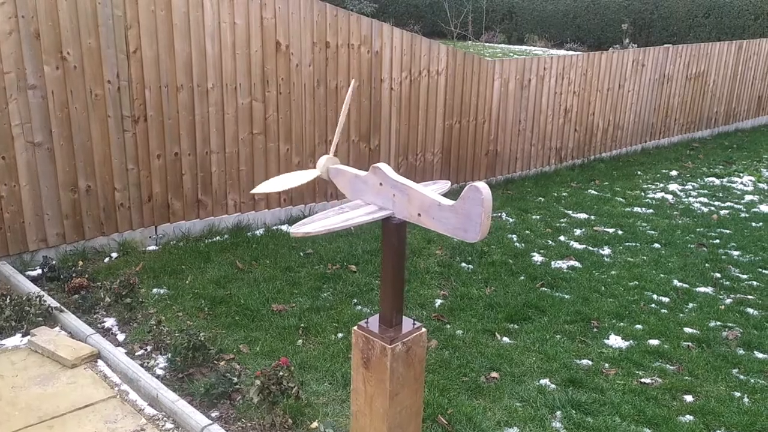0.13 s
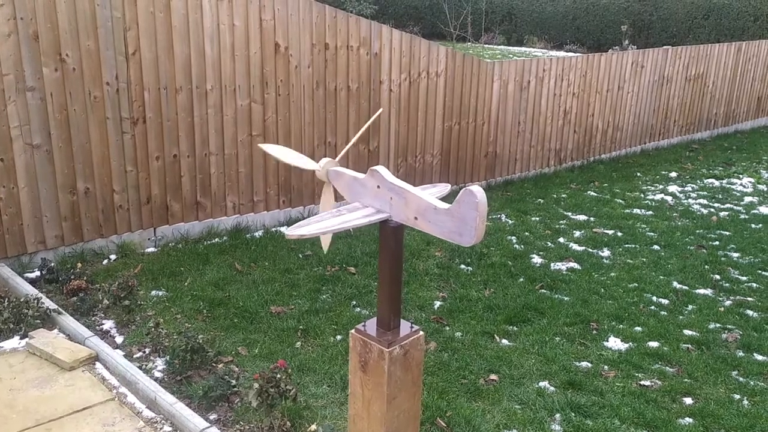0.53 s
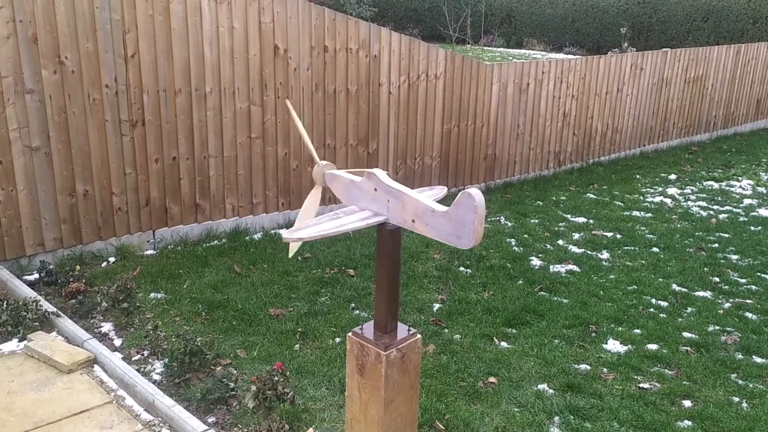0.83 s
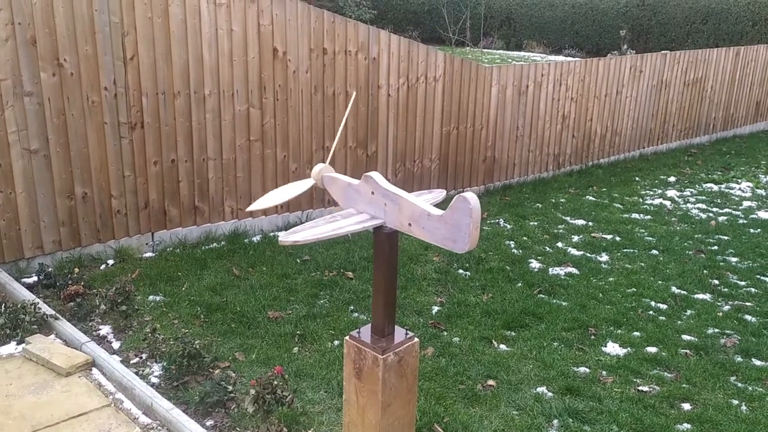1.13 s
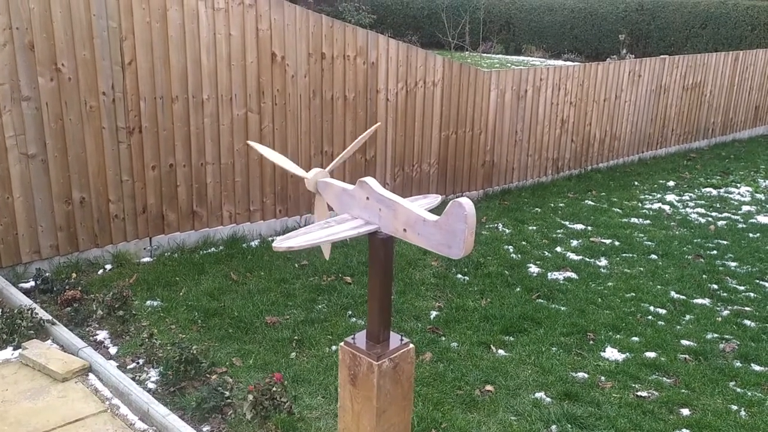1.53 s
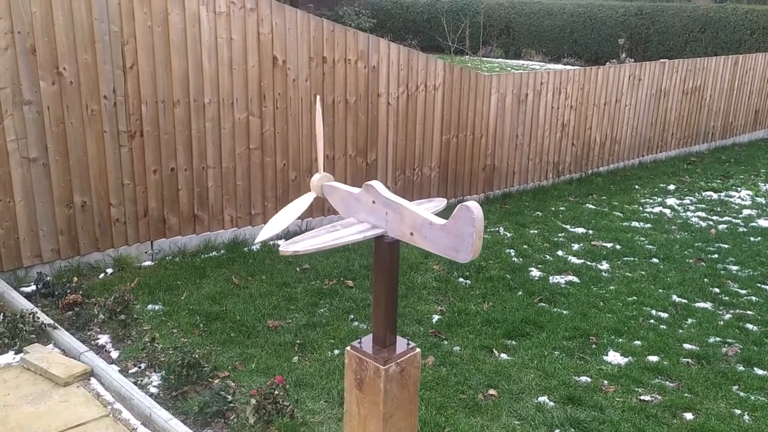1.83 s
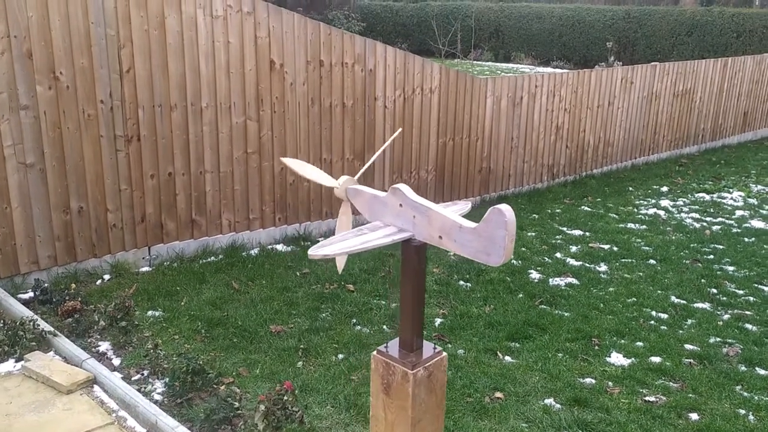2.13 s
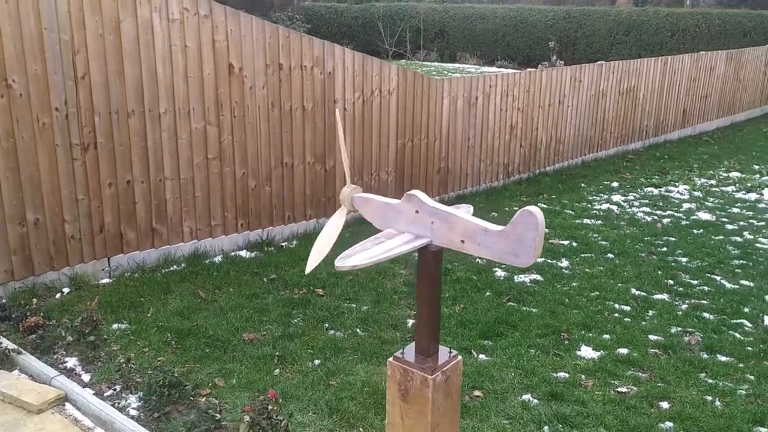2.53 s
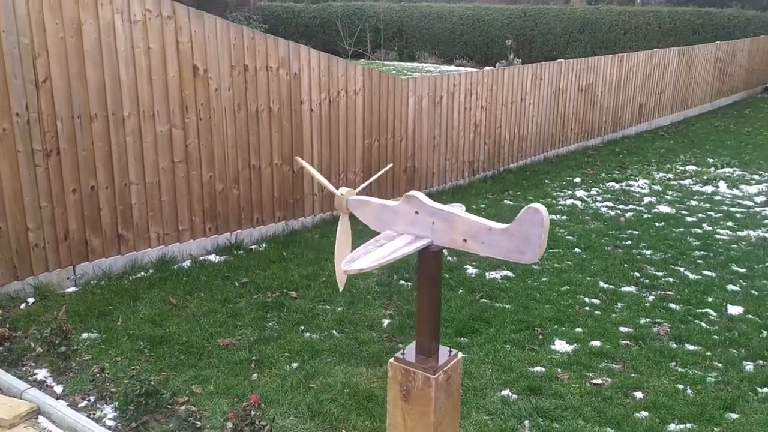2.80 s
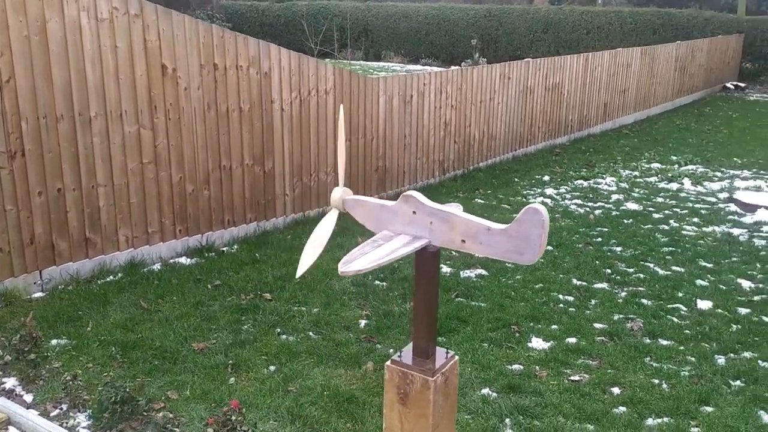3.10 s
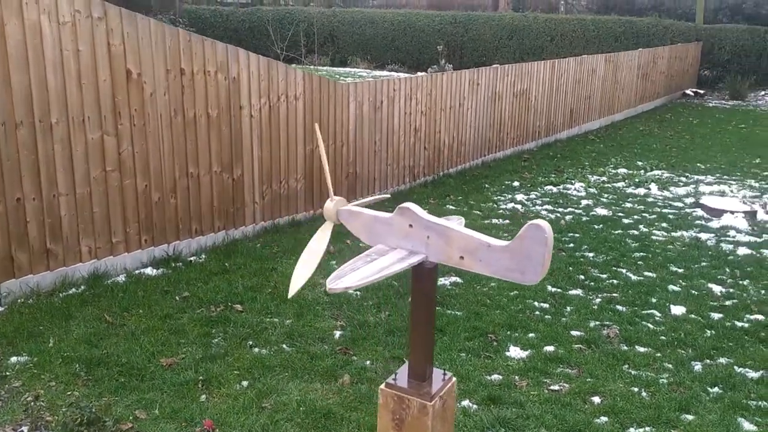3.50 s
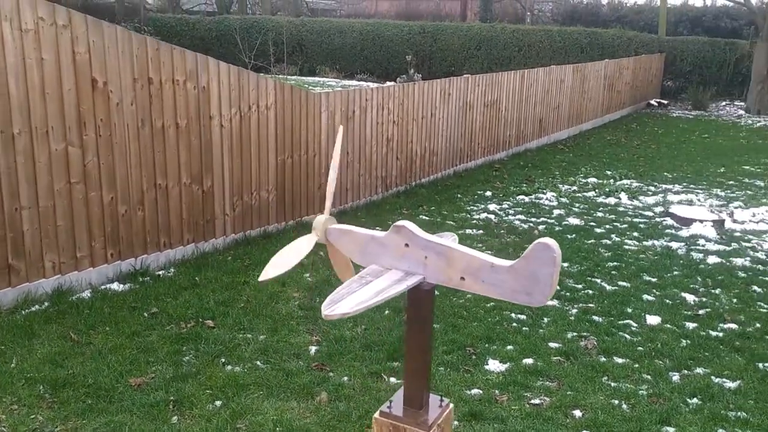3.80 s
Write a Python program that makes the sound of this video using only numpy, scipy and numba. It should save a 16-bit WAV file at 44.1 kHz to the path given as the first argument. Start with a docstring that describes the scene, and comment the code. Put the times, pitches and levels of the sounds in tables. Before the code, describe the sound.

Gusty wind rumbles and buffets against a handheld microphone in a quiet garden

```python
"""Gusty wind on a handheld microphone

Wind buffets the two ports of a microphone in a garden, each port on its own: filtered noise makes a deep rumble
that turns sharper whenever a fast eddy strikes, with pressure spikes, crackle and a little overload.
Behind it lie the hiss of hedges and far traffic (shaped noise), thin faint chirps and squeaks (gliding tones
blurred with narrow noise), and a few small clicks (short bursts of resonant noise)."""
import sys
import numpy as np
from scipy import signal
from scipy.fft import rfft, irfft
from scipy.io import wavfile
from scipy.ndimage import uniform_filter1d
from numba import njit

SR = 44100
rng = np.random.default_rng(int(sys.argv[2]) if len(sys.argv) > 2 else 0)


def log_audio(samples):
    """Write samples as a 16-bit WAV file to the path given in sys.argv[1]."""
    # one column per channel
    frames = np.atleast_2d(samples).T
    # limit to full scale, then quantise
    limited = np.clip(frames, -1, 1)
    pcm = np.round(limited * 32767).astype(np.int16)
    wavfile.write(sys.argv[1], SR, pcm)


N = 174195  # length in samples


def undb(db):
    """Turn decibels into a plain ratio."""
    return 10 ** (np.asarray(db) / 20)


def unit(x):
    """Scale a signal to an rms of 1."""
    return x / np.sqrt(np.mean(x ** 2))


def curve(table, index):
    """One column of a table, joined by straight lines in time."""
    a = np.array(table, float)
    return np.interp(np.arange(N) / SR, a[:, 0], a[:, index])


@njit
def svf(x, hz, k):
    """State-variable filter with moving centre and damping k; rows are low, band and high."""
    y, b, l = np.empty((3, len(x))), 0., 0.
    for i in range(len(x)):
        g = np.tan(np.pi * hz[i] / SR)
        v = (b + g * (x[i] - l)) / (1 + g * (g + k))
        low = l + g * v
        y[0, i] = low
        y[1, i] = k * v
        y[2, i] = x[i] - k * v - low
        b, l = 2 * v - b, 2 * low - l
    return y


def steady_svf(x, hz, k):
    """The same filter with its centre held still."""
    return svf(x, np.full(len(x), float(hz)), k)


def walk(hz):
    """Smooth random wander up to about hz, rms 1: noise averaged twice over a sliding window."""
    window = max(int(SR / hz), 1)
    once = uniform_filter1d(rng.standard_normal(N), window)
    return unit(uniform_filter1d(once, window))


def coloured(points):
    """Noise shaped to a spectrum of (pitch_hz, level_db) points, silent below the first, rms 1."""
    a = np.array(points, float)
    f = np.maximum(np.arange(N // 2 + 1) * SR / N, 1)
    shape_db = np.interp(np.log(f), np.log(a[:, 0]), a[:, 1])
    spectrum = rfft(rng.standard_normal(N)) * undb(shape_db) * (f > a[0, 0])
    return unit(irfft(spectrum, N))


def eddy_strength(eddies):
    """Strength in dB of the strongest eddy at each moment; each rises faster than it falls."""
    rise_share = 0.45  # rise time as a share of the fall time
    t, eddy_db = np.arange(N) / SR, np.zeros(N)
    for at, db, fall_ms in eddies:
        width_ms = fall_ms * np.where(t < at, rise_share, 1)
        bump = db * np.exp(-((t - at) * 1000 / width_ms) ** 2)
        eddy_db = np.maximum(eddy_db, bump)
    return eddy_db


def swirling_air():
    """Raw turbulence: noise weaker toward the treble, through the microphone's resonant low end, rms 1."""
    mic_low_hz, mic_q = 56, 0.88
    even, even_s = 0.9, 0.045  # how far slow chance swells are ironed out (0-1), and over what time
    f = np.maximum(np.arange(N // 2 + 1) * SR / N, 20)
    swirl = irfft(rfft(rng.standard_normal(N)) / f, N)
    swirl = unit(steady_svf(swirl, mic_low_hz, 1 / mic_q)[2])
    swell = uniform_filter1d(abs(swirl), int(even_s * SR))
    return unit(swirl / swell ** even)


def buffeting(gust_db, eddy_db):
    """Turbulence at one port: faster air moves the spectral edge up, and gusts and eddies swell the rumble."""
    slack_db, gust_edge = -33, 0.43  # gust level of slack air; speed gained per dB above it
    whip_db, whip_hz = 6, 168  # quick jitter of the air speed
    calm_hz, edge_per_db = 179.6, 0.3779  # edge in slack air; dB the edge climbs per dB of speed
    skirt_db, skirt_edge = -15.5, 1.83  # weaker fine turbulence reaching past the edge
    rumble_db, swell_per_db = 1.5, 0.139  # base level; dB of swell per dB of eddy
    flutter_db, flutter_hz = 2.0, 45.4  # random flutter of the level

    speed_db = np.maximum(eddy_db, gust_edge * (gust_db - slack_db)) + whip_db * walk(whip_hz)
    edge_hz = np.clip(calm_hz * undb(edge_per_db * speed_db), 20, 1100)
    swirl = swirling_air()
    body = svf(swirl, edge_hz, np.sqrt(2))[0]
    skirt = svf(swirl, skirt_edge * edge_hz, 0.44)[1]
    air = svf(body + undb(skirt_db) * skirt, skirt_edge * edge_hz, np.sqrt(2))[0]
    level_db = rumble_db + gust_db + swell_per_db * eddy_db + flutter_db * walk(flutter_hz)
    return air * undb(level_db)


def background():
    """Hedges hiss, brighter at first, and traffic drones far off; mostly unrelated at the two ports."""
    # overall level of the hiss, before its flutter and sheen: start_s, left_db, right_db
    hiss_levels = [(0.0, -57.5, -58.5), (0.44, -56.5, -63), (0.88, -59, -65), (1.32, -61, -62.5),
                   (1.76, -58.5, -59.5), (2.19, -61, -63.5), (2.63, -60, -61), (3.07, -57, -58.5),
                   (3.51, -58.5, -60), (3.95, -62, -63)]
    # tone of the hedges, relative: pitch_hz, level_db
    hedge_tone = [(2000, -12), (3500, 3.5), (5500, -1.5), (8000, -1), (10000, -1), (12000, -5.5),
                  (13500, -6.5), (15500, -6)]
    # tone of the traffic, relative: pitch_hz, level_db
    traffic_tone = [(200, -18.5), (500, 0.5), (1100, -9.5), (1600, -6), (2020, -7.5), (2250, -12.5),
                    (3000, -14.5), (5000, -70)]
    # boost or cut of the hiss above the bright edge: start_s, level_db
    sheen = [(0, 5.5), (.8, 12), (1.5, 1), (2.2, 0), (3, -13), (3.95, -25)]
    sheen_hz, traffic_db = 11400, -56

    shared, out = coloured(traffic_tone), []
    for c in range(2):
        low, _, high = steady_svf(coloured(hedge_tone), sheen_hz, np.sqrt(2))
        # the two halves are in opposite phase, so they join by subtraction
        hiss = low - high * undb(curve(sheen, index=1))
        hiss = hiss * undb(curve(hiss_levels, index=c + 1) + 1.8 * walk(36))
        traffic = coloured(traffic_tone) + 0.35 * shared
        out.append(hiss + traffic * undb(traffic_db + 1.9 * walk(8.1)))
    return np.array(out)


def chirps():
    """Short gliding notes, scattered on the way so that each port hears its own flutter."""
    # one note per row: start_s, length_s, start_hz, end_hz, level_db, breadth_hz
    notes = [(.03, 0.011, 7850, 7550, -47, 300), (.17, 0.11, 8300, 8200, -54, 500),
             (.15, 0.23, 5900, 5760, -64, 200), (.83, .07, 8300, 8300, -64, 150),
             (1.6, 0.116, 10600, 10400, -64, 200), (1.74, 0.11, 9200, 9200, -63, 150),
             (1.77, 0.16, 9700, 9660, -58.5, 100), (1.99, 0.056, 1440, 1445, -57.5, 25),
             (2.47, 0.047, 7560, 7700, -58.5, 200), (2.48, 0.053, 1560, 1530, -59, 25),
             (3.176, 0.098, 5750, 5850, -64, 80.5), (3.17, 0.16, 1105, 1094, -57.5, 25),
             (3.25, 0.069, 5915, 5885, -58.5, 30), (3.7, 0.098, 9100, 8900, -58.5, 700),
             (3.72, .09, 10600, 10700, -68, 200), (3.81, 0.061, 9600, 9500, -56, 500),
             (3.87, 0.099, 1430, 1405, -60, 25)]
    out = np.zeros((2, N))
    for at, length, start_hz, end_hz, db, width_hz in notes:
        i = int(at * SR)
        n = min(int(length * SR), N - i)
        hz = np.linspace(start_hz, end_hz, n)
        fade = np.sin(np.linspace(0, np.pi, n)) ** .5
        tone = np.sqrt(2) * np.sin(2 * np.pi * np.cumsum(hz) / SR)
        clear = np.exp(-width_hz / 150)  # share of pure tone: the broader the note, the less
        for c in range(2):
            blur = unit(svf(rng.standard_normal(n), hz, width_hz / start_hz)[1])
            note = clear * tone + np.sqrt(1 - clear ** 2) * blur
            out[c, i:i + n] += undb(db) * fade * note
    return out


def pops(rows):
    """Single cusps of pressure, pushing or sucking at random, each with its own width."""
    fall_s, round_s = .0006, .00009  # typical fall time of the spike; rounding of its tip
    sharp_db, blunting = -22, 1.15  # spikes weaker than this get rounder tips, dB per dB
    edge_hz = 1800  # band in which the peak level is set
    out, t = np.zeros(N), np.arange(-SR // 100, SR // 100) / SR
    for at, db in rows:
        way, wide = rng.standard_normal(2)
        tip_s = round_s * undb(blunting * max(sharp_db - db, 0))
        cusp = np.exp(-np.hypot(t, tip_s) / (fall_s * undb(2 * wide)))
        edge_peak = abs(steady_svf(cusp, edge_hz, np.sqrt(2))[1]).max()
        i = int(at * SR) - SR // 100
        out[i:i + len(t)] += np.sign(way) * cusp * undb(db) / edge_peak
    return out


def crackle(eddy_db):
    """Dense random kinks, softened by a low-pass, that grow out of the strongest eddies."""
    from_db, level_db = 35.5, -37  # eddy strength at which the kinks have this level
    kinks_per_s, soften_hz = 1300, 1150
    hits = (rng.random(N) < kinks_per_s / SR) * rng.standard_normal(N)
    kinks = unit(steady_svf(hits, soften_hz, 2.)[0])
    growth_db = np.clip(2 * (eddy_db - from_db), -80, 10)
    return kinks * undb(level_db + growth_db)


def clicks():
    """Tiny ticks: a burst of noise passed twice through one broad resonance."""
    # one tick per row: start_s, centre_hz, breadth_hz, peak_db (midway between ports), left_minus_right_db
    ticks = [(1.534, 3660, 350, -40.5, 4), (1.534, 4800, 900, -49, 4), (1.641, 10400, 2500, -45, 21),
             (2.552, 8500, 6000, -48, 15), (3.641, 11700, 2000, -53, 10)]
    decay_s = .002
    out, n = np.zeros((2, N)), SR // 50
    for at, hz, width_hz, db, pan_db in ticks:
        tick = rng.standard_normal(n) * np.exp(-np.arange(n) / SR / decay_s)
        for _ in range(2):
            tick = steady_svf(tick, hz, width_hz / hz)[1]
        i = int(at * SR)
        port_db = db + np.array([[pan_db], [-pan_db]]) / 2
        out[:, i:i + n] += tick / abs(tick).max() * undb(port_db)
    return out


def scene():
    """Wind at each port over the quiet garden."""
    # rumble of the gusts, before swell and flutter: start_s, left_db, right_db
    gusts = [(0.0, -28.5, -16), (0.195, -24.5, -21.5), (0.249, -22, -24.5), (0.334, -23, -13),
             (0.399, -13.4, -20.5), (0.489, -30.5, -20.5), (0.559, -18.5, -22.5), (0.589, -43, -19),
             (0.629, -14, -13.5), (0.668, -25, -13.5), (0.718, -8.5, -14), (0.788, -16, -16.5),
             (0.823, -23, -17), (0.893, -22, -14.5), (0.998, -16, -15.5), (1.068, -20, -17),
             (1.102, -26.5, -11.5), (1.152, -11.5, -17.5), (1.207, -16, -31), (1.282, -20.5, -23.5),
             (1.332, -17, -25.2), (1.372, -17, -20), (1.462, -24, -31.5), (1.512, -26.5, -13),
             (1.561, -17, -31.5), (1.661, -16.5, -24.5), (1.811, -25.5, -30.5), (1.891, -14, -29.5),
             (2.03, -27, -23.5), (2.125, -15.5, -40), (2.205, -30.5, -40), (2.25, -20, -33),
             (2.589, -29.5, -25), (2.634, -25, -22.5), (2.739, -32.5, -32.5), (2.784, -20.5, -22.5),
             (2.933, -27, -22), (2.968, -8, -21.5), (3.023, -19.5, -18), (3.083, -14.9, -13),
             (3.133, -13, -20), (3.198, -16, -18.5), (3.278, -16, -20), (3.387, -17.5, -18),
             (3.422, -14, -11), (3.507, -23.5, -24), (3.632, -27, -18), (3.672, -22.5, -31),
             (3.861, -28.5, -35.5), (3.946, -16.5, -21.5)]
    # fast eddies, a list for the left port then one for the right: peak_s, strength_db, fall_ms
    eddies = [
        [(0.275, 18, 12), (0.393, 23, 13.5), (0.557, 21, 12), (0.622, 14, 18), (0.7, 27, 17), (0.73, 11.5, 17),
         (0.762, 25, 7.9), (0.975, 20.5, 33), (1.027, 28.5, 14), (1.048, 24, 11), (1.199, 13.5, 23),
         (1.309, 19, 10.5), (1.372, 14, 15), (1.553, 28, 46), (1.636, 32.5, 35), (1.709, 24, 44),
         (1.822, 19.5, 28), (1.9, 18.5, 72), (1.86, 17.5, 23), (1.95, 29, 29), (1.98, 29, 16), (2.075, 18, 24),
         (2.117, 17, 35), (2.254, 22, 13), (2.472, 22, 32), (2.998, 59, 19.5), (3.014, 42.5, 25),
         (3.039, 41, 24), (3.091, 42, 7), (3.108, 40, 26), (3.128, 35.5, 23), (3.227, 30.5, 9.9),
         (3.246, 38.5, 15), (3.283, 35, 31), (3.419, 36, 11.6), (3.572, 25, 34), (3.692, 20.5, 10),
         (3.895, 24, 15), (3.925, 18.5, 77)],
        [(0.095, 25, 27), (0.207, 13.5, 30), (0.341, 24.5, 6), (0.535, 29, 42), (0.606, 31.5, 11),
         (0.71, 22, 27), (0.822, 37, 27.3), (0.916, 27.5, 40), (0.992, 29, 16), (1.128, 26.5, 48),
         (1.497, 8, 14), (1.663, 30, 20), (2.785, 15, 16), (2.882, 30, 8.8), (2.931, 17.1, 16),
         (2.975, 28.5, 10.4), (3.079, 21, 58), (3.168, 30.5, 20), (3.226, 29.5, 32), (3.29, 23.5, 24),
         (3.43, 28, 37)],
    ]
    # sharp pressure spikes, left port then right port: peak_s, edge_band_peak_db
    spikes = [
        [(0.3928, -20.5), (0.6993, -34), (0.7612, -24), (1.0224, -20.5), (1.5477, -22), (1.636, -28),
         (2.4724, -26), (2.9965, -11.5), (3.0113, -20), (3.016, -16), (3.035, -27), (3.039, -13),
         (3.046, -16.5), (3.0515, -12), (3.0906, -12.5), (3.1285, -24), (3.2478, -20.5), (3.281, -18),
         (3.416, -25), (3.4219, -21.5), (3.9196, -28.5)],
        [(0.3416, -27.5), (0.5346, -22.5), (0.6059, -31.5), (0.8202, -19), (0.8575, -24), (0.9195, -52),
         (0.9473, -33), (0.9928, -33), (3.4496, -28.5)],
    ]

    wind = []
    for c in range(2):
        eddy_db = eddy_strength(eddies[c])
        rumble = buffeting(curve(gusts, index=c + 1), eddy_db)
        wind.append(rumble + pops(spikes[c]) + crackle(eddy_db))
    return np.array(wind) + background() + chirps() + clicks()


def record(dry):
    """The input cuts the deepest bass, softly clips the biggest swings and loses the top."""
    cut_hz, ceiling, top_hz = 51.9, .75, 15640
    x = signal.sosfilt(signal.butter(4, cut_hz, "high", fs=SR, output="sos"), dry)
    x = x / (1 + abs(x / ceiling) ** 5) ** (1 / 5)
    return signal.sosfilt(signal.ellip(12, .2, 70, top_hz, fs=SR, output="sos"), x)


dry = scene()
out = record(dry)
log_audio(out)
```